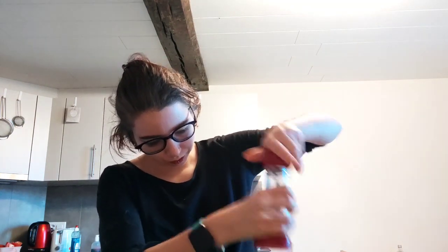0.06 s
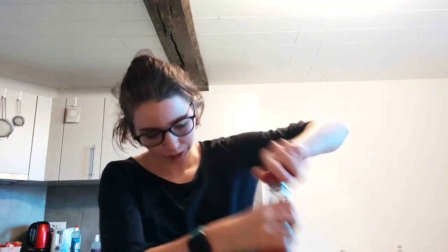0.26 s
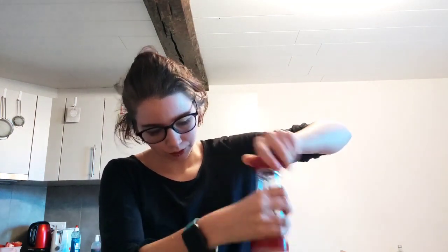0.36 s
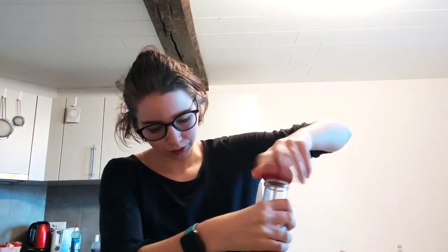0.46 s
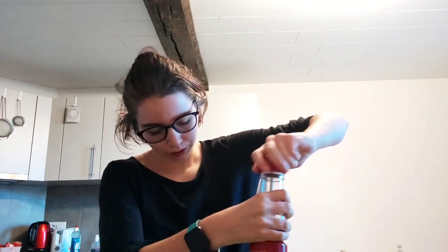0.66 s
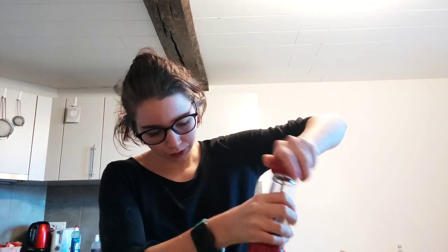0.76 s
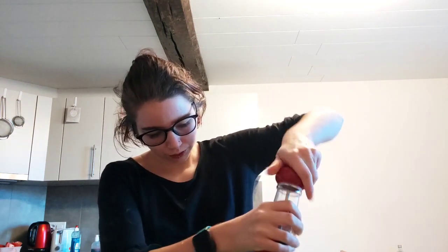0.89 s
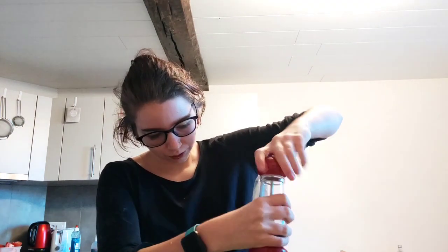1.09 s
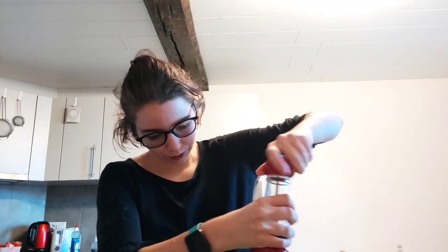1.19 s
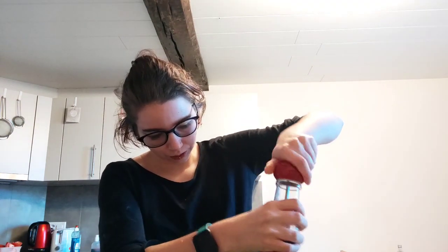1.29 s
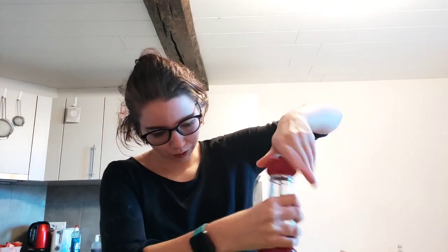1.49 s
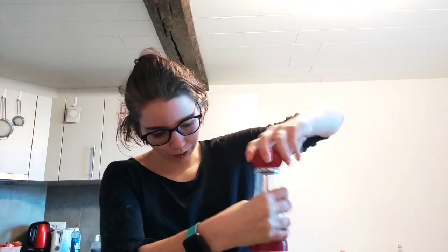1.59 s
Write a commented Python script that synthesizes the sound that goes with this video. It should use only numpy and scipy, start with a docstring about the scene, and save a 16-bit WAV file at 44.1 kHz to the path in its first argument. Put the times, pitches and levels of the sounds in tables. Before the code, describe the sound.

Pepper grinder close up: a crunchy twist cracks the corns, a small scuff follows, then a clicking, hollow jar rattle and a weaker second one, over faint air and hum in a small kitchen, bright small-microphone sound.

```python
"""A hand-twisted pepper mill in a small kitchen, heard by two small microphones with peaky ports.
Faint air (filtered noise) and hum (ringing sines) run on; an earlier sound's room tail fades at the start.
One gritty twist, made of clumped clicks, cracks peppercorns as noise bursts, and the mill creaks.
Then twice the hand grips the head anew: it knocks and corns rattle, clicks that ring the jar's modes.
Between the two grips the treble of the air dips briefly; small ticks and a scuff lie around the twist."""
import sys
import numpy as np
from scipy import signal
from scipy.fft import rfft, irfft
from scipy.io import wavfile

SR = 44100
rng = np.random.default_rng(int(sys.argv[2]) if len(sys.argv) > 2 else 0)


def elevation(decibels):
    """Turn decibel levels (scalar or array-like) into linear amplitude ratios."""
    levels = np.asarray(decibels, float)
    return 10 ** (levels / 20)


def generate_wav(sig):
    """Save sig (samples, or channels by samples) to the path in sys.argv[1] as 16-bit PCM at SR."""
    pcm = np.round(np.clip(np.atleast_2d(sig).T, -1, 1) * 32767).astype(np.int16)
    wavfile.write(sys.argv[1], SR, pcm)


N = 72765


def at_hz(points, hz):
    """Read a table on a log-frequency axis."""
    p = np.array(points)
    return np.interp(np.log(np.maximum(hz, 1)), np.log(p[:, 0]), p[:, 1])


def envelopes(rows):
    """Two gains over time from (t, dB, dB) rows: the first silent outside them, the second held."""
    s, db, lift_db = np.transpose(rows)
    t = np.arange(N) / SR
    return elevation(np.interp(t, s, db, left=-200, right=-200)), elevation(np.interp(t, s, lift_db))


def band(x, order, hz, kind):
    """Butterworth filter."""
    return signal.sosfilt(signal.butter(order, hz, kind, fs=SR, output="sos"), x)


def colour(x, points, size=8192):
    """Causal (minimum-phase) filter with the table's response."""
    # fold the cepstrum of the wanted response onto positive time
    cepstrum = irfft(np.log(elevation(at_hz(points, np.fft.rfftfreq(size, 1 / SR)))))
    cepstrum[1:size // 2] *= 2
    cepstrum[size // 2 + 1:] = 0
    h = irfft(np.exp(rfft(cepstrum)))[:size // 2]
    h = h.reshape((1,) * (x.ndim - 1) + (-1,))
    return signal.fftconvolve(x, h, axes=-1)[..., :x.shape[-1]]


def ring(clicks, hz, t60):
    """A unit click sets a decaying sine of starting height 1 ringing."""
    radius, w = elevation(-60 / (t60 * SR)), 2 * np.pi * hz / SR
    # the tiny offset keeps the resonator clear of slow denormal numbers
    return signal.lfilter([0, np.sin(w)], [1, -2 * radius * np.cos(w), radius * radius], clicks + 1e-18)


def grains(per_s, spread_db):
    """Random clicks of uneven size and either sign, rms 1."""
    hits = rng.random(N) < per_s / SR
    size = elevation(spread_db * np.minimum(rng.exponential(1, N), 3))
    clicks = hits * size * rng.choice([-1, 1], N)
    return clicks / np.sqrt(np.mean(clicks ** 2))


# left-right likeness of diffuse sound: [f/Hz, correlation -1 to 1]
LIKENESS = [(60, 0.88), (250, 0.58), (600, 0.54), (1500, 0), (3000, 0.25), (7000, -.1)]


def diffuse(length):
    """Two-channel noise, alike in the bass, mostly unrelated in the treble."""
    mid, side = rfft(rng.standard_normal((2, length)))
    c = np.clip(at_hz(LIKENESS, np.fft.rfftfreq(length, 1 / SR)), -1, 1)
    return irfft(np.sqrt((1 + c) / 2) * mid + np.sqrt((1 - c) / 2) * side * [[1], [-1]], length)


# steady air of the room, relative spectrum: [f/Hz, level/dB per Hz]
AIR_COLOUR = [(20, -1), (60, 0.5), (130, -2), (250, -7), (560, -12.5), (900, -16.5), (2000, -21),
              (3500, -28.5), (6000, -37), (16000, -46)]
# faint hum lines: [f/Hz, level/dB rms]
HUM_LINES = [(150, -71.5), (198, -73)]


def background():
    """Room air is coloured diffuse noise; each hum line is a long resonance fed with noise."""
    air_db, hum_t60_s = -62, 3.2
    lull_s, lull_length_s, lull_db = 1.168, 0.033, 9  # the treble of the air dips briefly
    t = np.arange(N) / SR
    air = colour(diffuse(N + SR), AIR_COLOUR)[:, SR:]  # the first second lets the filter settle
    air = elevation(air_db) * air / air.std()
    treble = signal.sosfiltfilt(signal.butter(2, 1500, "high", fs=SR, output="sos"), air)
    dip = elevation(-lull_db * np.exp(-((t - lull_s) / lull_length_s) ** 2))
    out = air - treble * (1 - dip)
    for hz, db in HUM_LINES:
        line = ring(rng.standard_normal(N + SR), hz, hum_t60_s)[SR:]
        out = out + elevation(db) * line / line.std()
    return out


# the fading room tail of an earlier sound, then two bouts of corns rattling in the jar:
# [t/s, level/dB, lift of the hollow low modes/dB]
RATTLE = [
    [(0, -77, 10), (.07, -85.5, 17)],
    [(.752, -67.5, 14.5), (.765, -64, -4), (.78, -63, 9), (.82, -65, -4), (.845, -74, -9), (.9, -73, -4)],
    [(1.2, -96, 0), (1.24, -86, 0), (1.289, -92, 0), (1.298, -76, -10), (1.313, -68, 3), (1.34, -73, -8),
     (1.365, -87, -15), (1.45, -93, -10)],
]
# a creak of the mill in the twist, then knocks of head and hand on the jar:
# [t/s, bright mode level/dB, middle mode level/dB, hollow low mode level/dB], before scatter
KNOCKS = [(0.3205, -50, -30, -45), (0.680, -77, -77, -36.5), (0.7504, -25, -26, -32.5),
          (0.7575, -33, -28, -50), (0.7735, -35, -35, -33), (0.777, -34, -34, -32.5),
          (0.797, -36, -38, -31), (0.8150, -30, -35, -63), (0.819, -38, -35, -26), (0.847, -41, -44, -52),
          (1.239, -75, -60, -74), (1.2912, -45.5, -50, -60), (1.3174, -47, -35, -38),
          (1.327, -46, -50, -50)]
# modes of the jar: [f/Hz, level/dB, t60/s]
JAR_MODES = [(347, -9.5, 0.0087), (518, -11.5, 0.022), (647, -10, 0.012), (1037, -21.5, 0.04),
             (1492, -5.5, 0.0076), (1681, -8, 0.027), (1914, -3, 0.012), (2454, 1, 0.0048),
             (2900, 1, 0.0034), (4570, 2.5, 0.0016), (5506, -1, 0.0018), (6380, -8, 0.0027),
             (9070, -11, 0.0016), (12700, -7.5, 0.00086)]


def jar():
    """Fading tail, creak, knocks and rattle are clicks into the jar's modes, each with own strengths."""
    hollow_below_hz, middle_below_hz = 800, 3000
    scatter_db, low_cut_hz = 3.0, 240
    rattle_middle_db = -3  # light corns move the middle modes less
    s, bright_db, middle_db, hollow_db = np.transpose(KNOCKS)
    at = (s * SR).astype(int)
    patter = grains(per_s=1500, spread_db=2.5)
    bright_rattle = sum(envelopes(bout)[0] for bout in RATTLE)
    hollow_rattle = sum(np.prod(envelopes(bout), axis=0) for bout in RATTLE)
    knock_scatter = rng.standard_normal((len(s), len(JAR_MODES)))
    out = np.zeros(N)
    for k, (hz, mode_db, t60) in enumerate(JAR_MODES):
        if hz < hollow_below_hz:
            rattle, knock_db = hollow_rattle, hollow_db
        elif hz < middle_below_hz:
            rattle, knock_db = bright_rattle * elevation(rattle_middle_db), middle_db
        else:
            rattle, knock_db = bright_rattle, bright_db
        clicks = patter * rattle * elevation(scatter_db * rng.standard_normal(N))
        clicks[at] += elevation(knock_db + scatter_db / 2 * knock_scatter[:, k])
        out = out + (-1) ** k * elevation(mode_db) * ring(clicks, hz, t60)  # signs alternate
    return band(out, 4, low_cut_hz, "high")


# cracks of corns in the twist, with small ticks and a scuff before and after it: [t/s, level/dB]
CRACKS = [(0.0251, -53), (0.2095, -44), (0.2533, -33), (0.2684, -38), (0.3014, -23), (0.3075, -26),
          (0.3136, -22), (0.3178, -25), (0.3203, -22), (0.3266, -24), (0.3318, -23), (0.3363, -23),
          (0.3502, -27), (0.4985, -40), (0.5192, -36), (1.2365, -52), (1.4107, -50)]


def cracks_and_ticks():
    """Splitting corns, ticks and scuff are short noise bursts: a quick rise, an exponential decay."""
    rise_s, t60_s = .0009, .0075
    t = np.arange(400) / SR
    shape = elevation(-60 * t / t60_s) * np.minimum(t / rise_s, 1)
    bursts = rng.choice([-1, 1], (len(CRACKS), len(t))) * shape
    edge = np.abs(rfft(bursts))[:, 60:82]  # about 6.6 to 9 kHz: made equally strong in every burst
    bursts = bursts / np.sqrt(np.mean(edge ** 2, axis=1, keepdims=True)) * np.sqrt(np.mean(edge ** 2))
    out = np.zeros(N)
    for (s, db), burst in zip(CRACKS, bursts):
        start = int(s * SR)
        out[start:start + len(t)] += elevation(db) * burst
    return out


# pressure of the twist on the grit: [t/s, level/dB, lift of the mill's body/dB]
TWIST = [(.18, -80.5, 14), (.21, -61.5, 4.5), (.235, -48.5, 5.5), (.255, -45, 1), (.285, -46.5, 6.5),
         (.299, -47, 7.5), (.322, -35.5, -3), (.365, -52.5, -13.5), (.385, -46.5, 2.5), (.485, -58, 5.5),
         (.51, -44.5, -1.5), (.54, -46.5, -1.5), (.575, -61.5, 5.5), (.63, -84, 20.5), (.72, -69, 14.5)]
# colour of grit, cracks and ticks: [f/Hz, level/dB]
GRIT_COLOUR = [(200, -8), (600, -11.5), (1100, -17.5), (1600, -2), (2200, -1), (3100, -5), (4100, -7),
               (4900, 8), (5900, -7), (8000, -2), (16000, -3.5)]


def grinding():
    """Clumped grit under the twist, with cracks and ticks; body, burrs and edge answer unevenly."""
    clump_db, crack_body_db = 2.5, -7
    body_below_hz, edge_above_hz = 3600, 6300
    steps = np.arange(0, N, 130)  # a new random clump level about every 3 ms
    body_clump, burr_clump, edge_clump = (elevation(clump_db * np.interp(np.arange(N), steps, c))
                                          for c in rng.standard_normal((3, len(steps))))
    pressure, body_lift = envelopes(TWIST)
    sources = np.array([grains(per_s=3000, spread_db=3.5) * pressure, cracks_and_ticks()])
    body_grit, body_crack = band(sources, 4, body_below_hz, "low")
    burr_grit, burr_crack = band(sources, 4, (body_below_hz, edge_above_hz), "band")
    edge_grit, edge_crack = band(sources, 4, edge_above_hz, "high")
    # squaring doubles the swing in dB: body and burrs clump harder than the edge
    grit = body_lift * body_clump ** 2 * body_grit + burr_clump ** 2 * burr_grit + edge_clump * edge_grit
    cracks = elevation(crack_body_db) * (body_crack + burr_crack) + edge_crack
    return colour(grit + cracks, GRIT_COLOUR)


def kitchen(x):
    """Direct sound, a little later on the left, near echoes and a diffuse tail whose treble dies sooner."""
    t60_s, treble_t60_s, onset_s, tail_db = 0.29, 0.15, 0.00061, 0
    late_t60_s, late_db = 0.55, -7
    near_span_s, near_db, left_lag_s = .003, -11, .00003
    t = np.arange(SR) / SR
    noise = diffuse(len(t))
    low = band(noise, 2, 3000, "low")
    tail = low * elevation(-60 * t / t60_s) + (noise - low) * elevation(-60 * t / treble_t60_s)
    tail = tail + noise * elevation(late_db - 60 * t / late_t60_s)
    tail = tail * (1 - np.exp(-t / onset_s))
    tail = elevation(tail_db) * tail / np.sqrt(np.sum(tail ** 2) / 2)
    # six near echoes off hands and worktop, other ones for each ear
    when, sign = rng.uniform(.1, 1, (2, 6)), rng.choice([-1, 1], (2, 6))
    tail[[[0], [1]], (when * near_span_s * SR).astype(int)] += elevation(near_db) * sign
    n = np.arange(N)
    direct = np.array([np.interp(n - left_lag_s * SR, n, x), x])
    return direct + signal.fftconvolve(x[None], tail, axes=-1)[:, :N]


def scene():
    """Mill in the kitchen over the background."""
    return kitchen(grinding() + jar()) + background()


def roll_off(x):
    """The treble ends steeply here."""
    return signal.sosfilt(signal.butter(12, 16410, fs=SR, output="sos"), x)


# microphone ports, left then right: [resonance f/Hz, width between quarter-power points/Hz, lift/dB]
PORTS = [(8440, 2815, 25), (7363, 1435, 25.5)]
# response common to both microphones: [f/Hz, level/dB]
CAPSULE = [(20, -1.5), (9000, 1.5), (9350, -1), (9600, -13), (10500, -5.5), (12000, -4), (15200, -3.5),
           (16300, -47.5)]
# left minus right: [f/Hz, level/dB]
LEAN = [(60, 4), (400, 2.5), (1400, 1), (3300, -3.5), (5500, -5), (10000, -4.5)]


def record(dry):
    """Each port lifts its own resonance; the capsules fall off above."""
    hz = np.geomspace(20, 22000, 400)
    channels = []
    for x, (port_hz, width_hz, lift_db), lean in zip(dry, PORTS, (.5, -.5)):
        detune = 2 * (hz - port_hz) / width_hz
        peak_db = 10 * np.log10(1 + elevation(2 * lift_db) / (1 + detune ** 2) ** 2)
        response_db = peak_db + at_hz(CAPSULE, hz) + lean * at_hz(LEAN, hz)
        channels.append(colour(x, np.c_[hz, response_db]))
    return roll_off(np.array(channels))


dry = scene()
out = record(dry)
generate_wav(out)
```